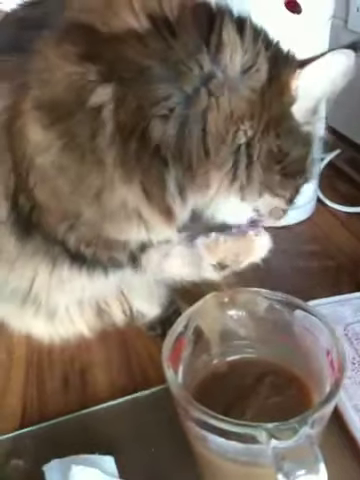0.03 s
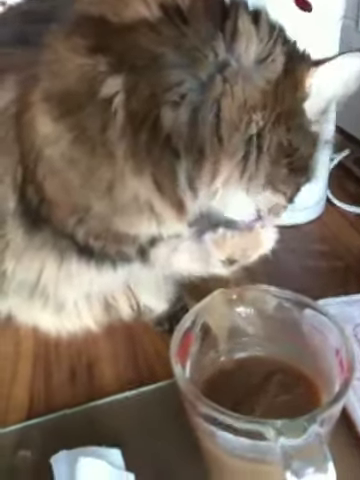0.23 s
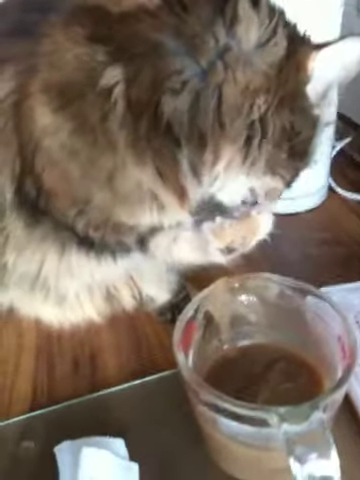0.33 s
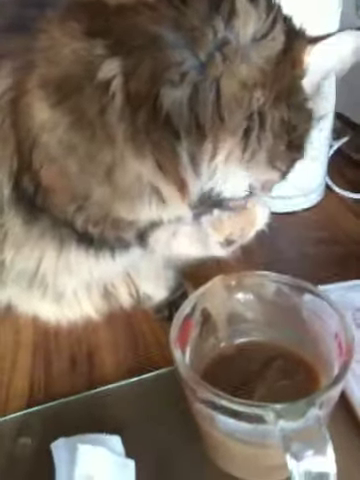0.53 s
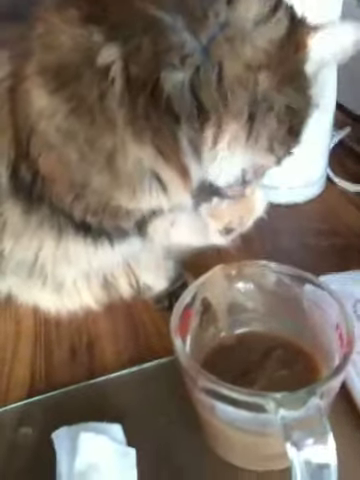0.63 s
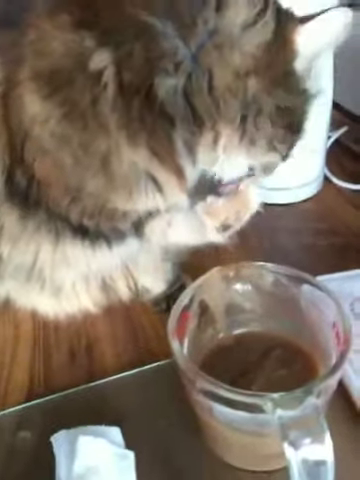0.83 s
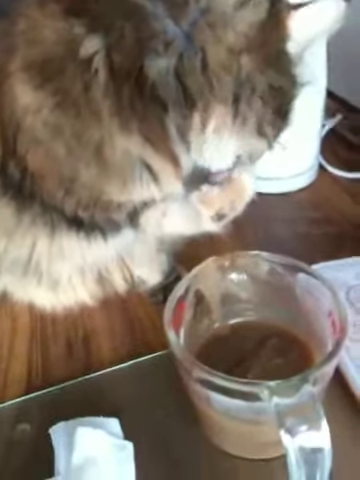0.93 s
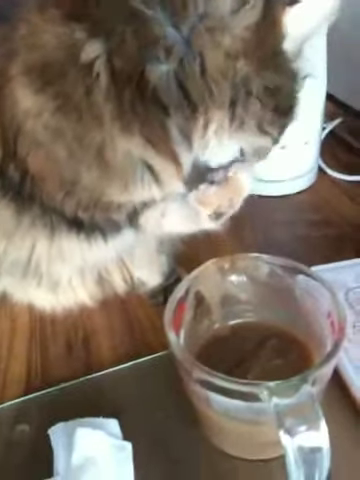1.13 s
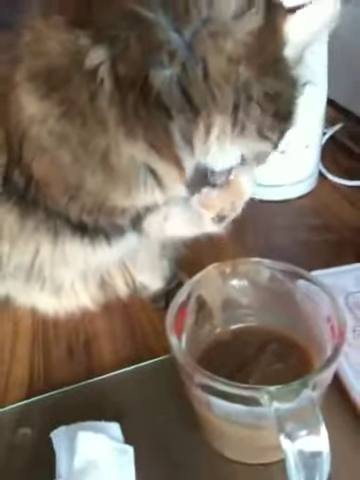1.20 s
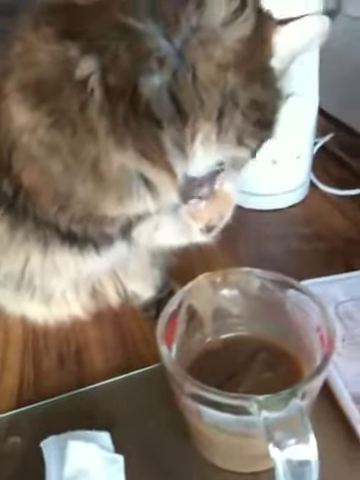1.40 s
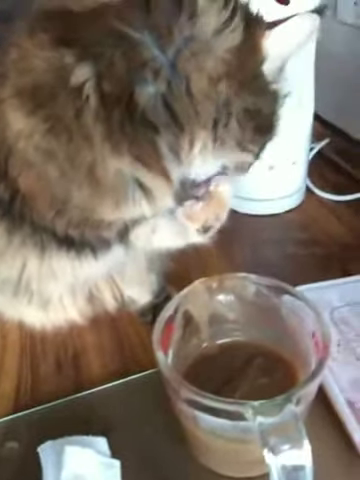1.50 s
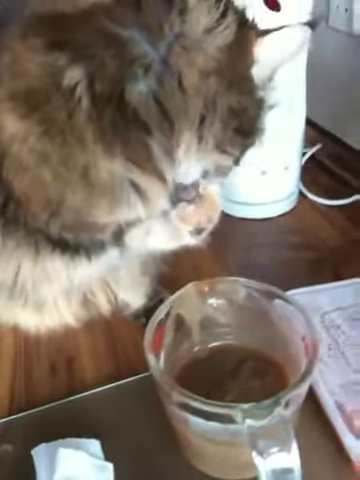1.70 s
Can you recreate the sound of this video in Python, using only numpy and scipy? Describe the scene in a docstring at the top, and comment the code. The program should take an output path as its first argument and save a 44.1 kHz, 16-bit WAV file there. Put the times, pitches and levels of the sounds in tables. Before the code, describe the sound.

A cat licking its paw with soft, dull tongue smacks in a quiet room.

```python
"""Cat licking its paw

Close up in a quiet room, about three strokes a second. Each stroke is a cluster of soft, dull
tongue and mouth bumps that fall in pitch, with stick-slip rasps, scratches and a faint rub on fur.
Behind it lie a low room rumble, hiss and a thin electrical whine.
Once the sound drops out briefly, with a tick at each edge."""
import sys
import numpy as np
from scipy import signal
from scipy.fft import rfft, irfft
from scipy.io import wavfile
from scipy.ndimage import uniform_filter1d

SR = 44100
rng = np.random.default_rng(int(sys.argv[2]) if len(sys.argv) > 2 else 0)


def output_pcm(signal):
    """Save a mono or channel-first signal as 16-bit PCM at the path in sys.argv[1].

    Samples are clipped to [-1, 1] before scaling.
    """
    pcm = np.clip(np.atleast_2d(signal).T, -1, 1) * 32767
    wavfile.write(sys.argv[1], SR, np.round(pcm).astype(np.int16))


N = 77175
LOW_CUT_HZ = 59.7


def amp(db):
    """Decibels to gain."""
    return 10 ** (np.asarray(db) / 20)


def unit_rms(x):
    """Scales to rms 1."""
    return x / np.sqrt(np.mean(x ** 2) + 1e-20)


def add(mix, start_s, sound):
    """Mixes a sound in at start_s."""
    part = mix[max(round(start_s * SR), 0):][:len(sound)]
    part += sound[:len(part)]


def butterworth(x, cutoff_hz, kind, order):
    """Causal high-pass or low-pass."""
    sos = signal.butter(order, min(cutoff_hz, SR / 2 - 1), kind, fs=SR, output="sos")
    return signal.sosfilt(sos, x)


def noise(spectrum):
    """Noise of rms 1, shaped by rows of freq_hz, density_db."""
    freq_hz, density_db = np.transpose(spectrum)
    shape_db = np.interp(np.log(np.fft.rfftfreq(N, 1 / SR) + 1), np.log(freq_hz), density_db)
    return unit_rms(irfft(rfft(rng.standard_normal(N)) * amp(shape_db), N))


def bump(start_hz, end_hz, peak_s):
    """Soft, heavily damped knock: rounded onset, pitch falling within milliseconds."""
    glide_s = 0.0021
    t = np.arange(SR // 20) / SR
    cycles = end_hz * t + (start_hz - end_hz) * glide_s * (1 - np.exp(-t / glide_s))
    envelope = t / peak_s * np.exp(1 - t / peak_s)
    knock = envelope * np.sin(2 * np.pi * cycles)
    dulled = butterworth(knock, 1.156 * start_hz, "low", order=5)
    return butterworth(dulled, LOW_CUT_HZ, "high", order=2)


def smacks():
    """Distinct bumps of tongue and mouth on the paw."""
    # contacts: start_s, level_db, start_hz, end_hz, peak_s
    contacts = [(0.0786, -46.5, 322, 109, 0.0017), (0.1229, -41.5, 650, 162, 0.0016),
                (0.1924, -44.5, 480, 161, 0.0053), (0.2229, -41, 500, 114, 0.0027),
                (0.2407, -36, 480, 110, 0.00034), (0.2425, -41.5, 488, 270, 0.0029),
                (0.2561, -41.5, 460, 113, 0.0057), (0.2669, -34, 303, 114, 0.0023),
                (0.2822, -42.5, 217, 169, 0.0015), (0.2992, -35.5, 310, 110, 0.004),
                (0.306, -42.5, 222, 110, 0.0057), (0.3213, -24, 454, 153, 0.0022),
                (0.341, -43, 183, 167, 0.0059), (0.3584, -33, 148, 112, 0.0018),
                (0.3732, -31.5, 317, 102, 0.0015), (0.3803, -28.5, 636, 127, 0.0027),
                (0.4114, -38.5, 300, 113, 0.0043), (0.4252, -40.5, 340, 110, 0.0043),
                (0.4631, -39, 520, 282, 0.0017), (0.498, -49.5, 174, 104, 0.0078),
                (0.653, -31, 439, 302, 0.0012), (0.6707, -42, 186, 111, 0.0034),
                (0.6927, -38.5, 396, 108, 0.0024), (0.6978, -37.5, 488, 106, 0.0066),
                (0.7123, -32, 444, 110, 0.00031), (0.722, -43, 365, 103, 0.0012),
                (0.7833, -42, 430, 168, 0.0056), (0.822, -53, 520, 170, 0.0041),
                (0.8412, -41, 380, 110, 0.004), (0.9396, -39, 510, 108, 0.0047),
                (0.9855, -38.5, 440, 425, 0.00088), (0.9921, -32.5, 154, 109, 0.0013),
                (1.0132, -36.5, 484, 440, 0.00067), (1.014, -33, 380, 108, 0.0034),
                (1.035, -49, 704, 665, 0.0011), (1.0378, -34.5, 357, 112, 0.0036),
                (1.059, -45.7, 258, 110, 0.0048), (1.0933, -51.5, 308, 281, 0.0024),
                (1.303, -46, 437, 109, 0.0036), (1.3214, -40.5, 438, 119, 0.0039),
                (1.335, -40, 440, 111, 0.0036), (1.353, -42.5, 464, 114, 0.0031),
                (1.4131, -33, 440, 104, 0.0032), (1.4406, -38, 324, 110, 0.0033),
                (1.487, -37.5, 520, 102, 0.0045), (1.6539, -44, 520, 165, 0.0032)]
    out = np.zeros(N)
    for start_s, level_db, start_hz, end_hz, peak_s in contacts:
        add(out, start_s, amp(level_db) * bump(start_hz, end_hz, peak_s))
    return out


def rasps():
    """The dragging tongue sticks and slips: short runs of tiny, nearly regular bumps."""
    # stick-slip runs: start_s, end_s, slips_per_s, level_db
    runs = [(0.549, .592, 96, -52.5), (1.17, 1.295, 72, -55.5), (1.614, 1.705, 76, -52.5)]
    jitter_s, spread_db = 0.00081, 0.5
    slip = bump(start_hz=489, end_hz=160, peak_s=0.0035)
    out = np.zeros(N)
    for start_s, end_s, slips_per_s, level_db in runs:
        times_s = np.arange(start_s, end_s, 1 / slips_per_s)
        for slip_s, (late, size) in zip(times_s, rng.standard_normal((20, 2))):
            add(out, slip_s + jitter_s * late, amp(level_db + spread_db * size) * slip)
    return out


def scratches():
    """Rough tongue through fur: gritty noise bursts in a broad band above the bumps."""
    # bursts: middle_s, level_db, centre_hz, half_length_s
    bursts = [(0.129, -65.5, 740, 0.004), (0.245, -67.5, 930, 0.0057), (0.286, -74, 990, 0.003),
              (0.309, -71, 1080, 0.0068), (0.322, -64.5, 1290, 0.0011), (0.382, -66, 960, 0.0048),
              (0.559, -75, 660, 0.012), (0.653, -62, 800, 0.00094), (0.697, -69.5, 880, 0.0064),
              (0.784, -66, 620, .003), (.987, -66.5, 828, 0.0069), (1.097, -65, 530, 0.0025),
              (1.301, -73.5, 704, 0.0072), (1.412, -69.5, 815, 0.0019), (1.43, -67, 745, 0.0016),
              (1.654, -75, 960, 0.0036)]
    width_oct, samples = 0.44, 2048
    t = np.arange(samples) / SR
    freq_hz = np.fft.rfftfreq(samples, 1 / SR) + 1
    out = np.zeros(N)
    for middle_s, level_db, centre_hz, half_length_s in bursts:
        band = np.exp(-(np.log2(freq_hz / centre_hz) / width_oct) ** 2)
        swell = np.exp(-((t - t.mean()) / half_length_s) ** 2)
        swell_rms = np.sqrt(np.mean(swell ** 2))
        burst = unit_rms(irfft(rfft(rng.standard_normal(samples) * swell) * band))
        add(out, middle_s - t.mean(), amp(level_db) * swell_rms * burst)
    return out


def fur_rub():
    """Tiny catches in the fur over a dull rub, both following the tongue's pressure."""
    # pressure swells: middle_s, half_length_s, level_db
    strokes = [(0.111, 0.028, -54.5), (0.28, .045, -57), (0.33, 0.08, -52), (.415, 0.018, -62),
               (0.575, 0.029, -66), (0.705, 0.013, -48), (0.79, 0.055, -57.5), (.995, 0.015, -51.5),
               (1.084, 0.073, -66), (1.302, 0.026, -63), (1.452, 0.027, -63), (1.672, 0.048, -66)]
    # rub spectrum: freq_hz, density_db
    rub_spectrum = [(30, -29), (120, 2), (400, 1.5), (700, -13.5), (1200, -23), (2200, -34), (5000, -37.5),
                    (16000, -106)]
    catches_per_s, spread_db, catch_db, rub_db = 280, 2, -3, -11
    t = np.arange(N) / SR
    pressure = np.sqrt(sum(amp(level_db) ** 2 * np.exp(-((t - middle_s) / half_length_s) ** 2)
                           for middle_s, half_length_s, level_db in strokes))
    pitches_hz = np.geomspace(287, 657, 10)
    catches = np.zeros(N)
    for start_hz in pitches_hz:
        onsets = rng.random(N) < catches_per_s / len(pitches_hz) / SR
        impulses = onsets * amp(spread_db * rng.standard_normal(N))
        catches += signal.oaconvolve(impulses, bump(start_hz, end_hz=151, peak_s=0.0026))[:N]
    return pressure * (amp(catch_db) * unit_rms(catches) + amp(rub_db) * noise(rub_spectrum))


def room():
    """Gently uneven rumble, steady hiss and a thin electrical whine."""
    # rumble spectrum: freq_hz, density_db
    rumble_spectrum = [(20, -28.5), (45, -10), (80, 1), (130, 4), (190, -1), (260, -8), (400, -22),
                       (600, -35.5), (1000, -35), (3000, -48.5), (16000, -86)]
    # hiss spectrum: freq_hz, density_db
    hiss_spectrum = [(20, 3.2), (1000, 3.1), (2000, 1.33), (4000, 0.051), (8000, -0.46), (12000, -0.48),
                     (16000, -1.7)]
    # whine tones: pitch_hz, level_db
    tones = [(7485, -90), (7545, -111.5), (14910, -105), (14970, -100.5), (15030, -90), (15090, -103)]
    rumble_db, drift_db, hiss_db = -60, 1, -75
    t = np.arange(N) / SR
    drift = unit_rms(sum(np.sin(2 * np.pi * (rate_hz * t + rng.random())) / np.sqrt(rate_hz)
                         for rate_hz in np.geomspace(1, 10, 20)))
    whine = sum(amp(level_db) * np.sqrt(2) * np.sin(2 * np.pi * (pitch_hz * t + rng.random()))
                for pitch_hz, level_db in tones)
    rumble = amp(rumble_db + drift_db * drift) * noise(rumble_spectrum)
    hiss = amp(hiss_db) * noise(hiss_spectrum)
    return rumble + hiss + whine


def dropout(x):
    """The level dips briefly, with a dull tick at each edge."""
    # dropout start and end: time_s, tick_db
    edges = [(0.7327, -24.5), (.7483, -28)]
    depth_db = -26
    rise_s, decay_s, tick_hz = 0.00072, 0.0036, 143.5
    t = np.arange(N) / SR
    outside = (t < edges[0][0]) | (t > edges[1][0])
    gate = uniform_filter1d(outside.astype(float), size=30)
    envelope = (1 - np.exp(-t / rise_s)) * np.exp(-t / decay_s)
    tick = butterworth(-envelope * np.cos(2 * np.pi * tick_hz * t), LOW_CUT_HZ, "high", order=2)
    ticks = np.zeros(N)
    for time_s, tick_db in edges:
        add(ticks, time_s, amp(tick_db) * tick)
    return x * np.maximum(gate, amp(depth_db)) + ticks


def scene():
    """The cat in the room, mono."""
    return (smacks() + rasps() + scratches() + fur_rub() + room())[None]


def record(dry):
    """Dropout, then a steep low-pass."""
    cutoff_hz = 15850
    low_pass = signal.firwin(511, cutoff_hz, window=("kaiser", 9), fs=SR)
    return signal.oaconvolve(dropout(dry), low_pass[None], "same")


dry = scene()
out = record(dry)
output_pcm(out)
```